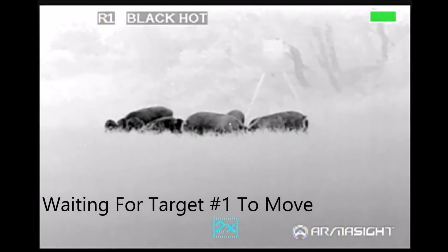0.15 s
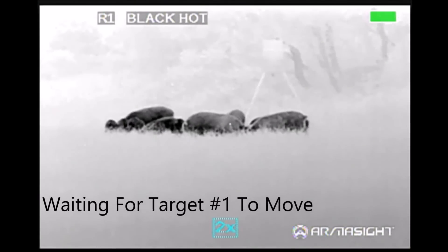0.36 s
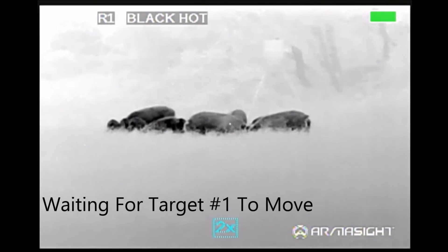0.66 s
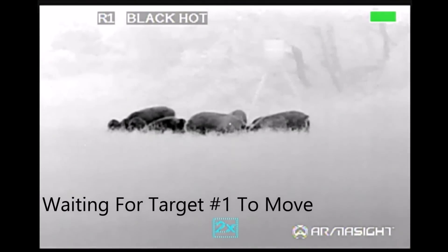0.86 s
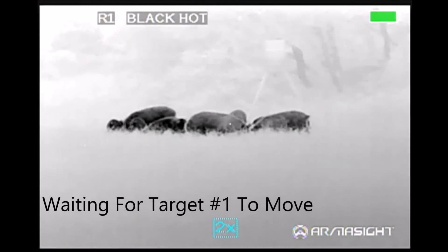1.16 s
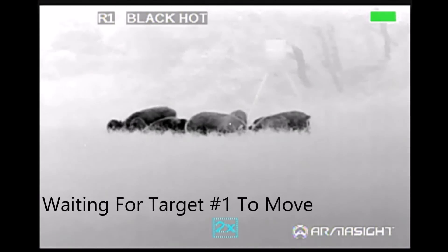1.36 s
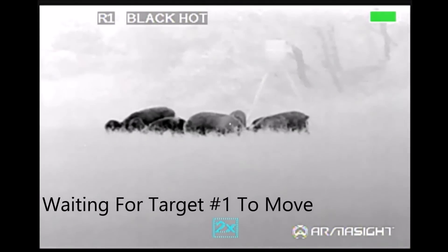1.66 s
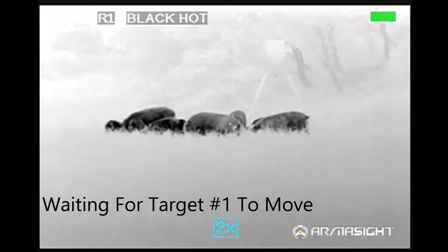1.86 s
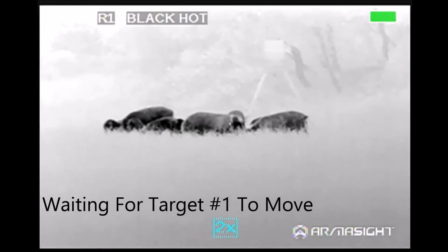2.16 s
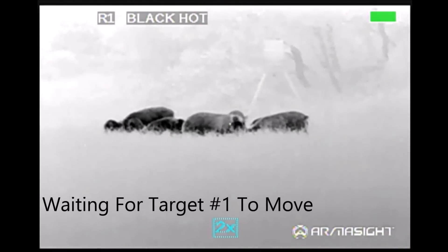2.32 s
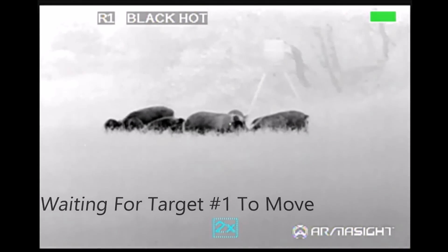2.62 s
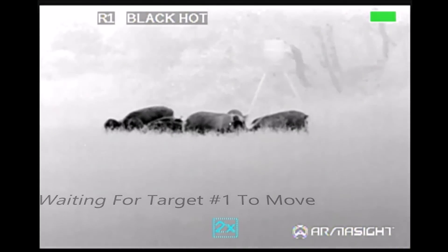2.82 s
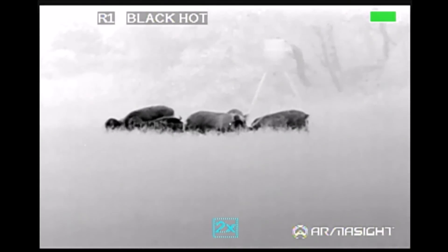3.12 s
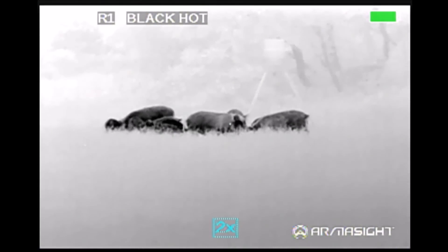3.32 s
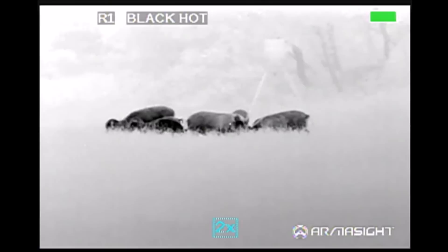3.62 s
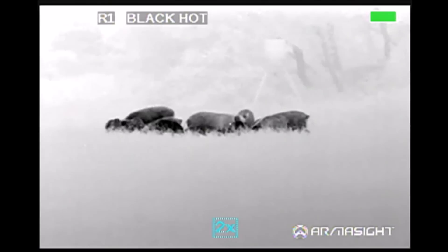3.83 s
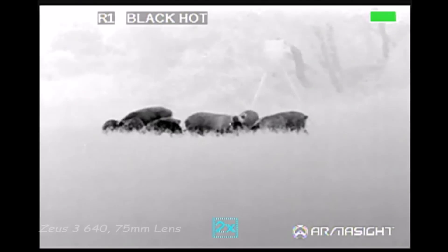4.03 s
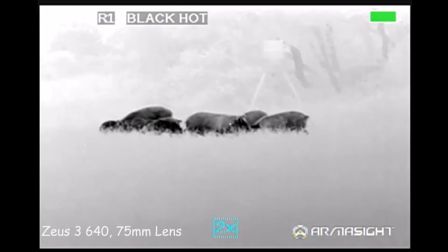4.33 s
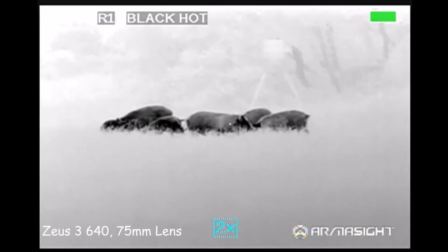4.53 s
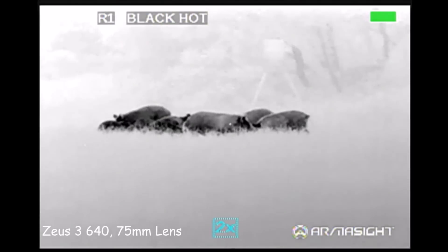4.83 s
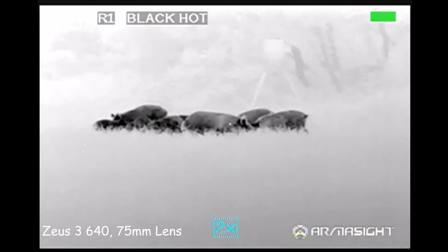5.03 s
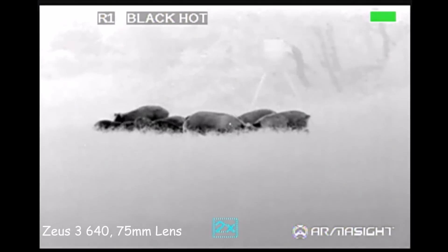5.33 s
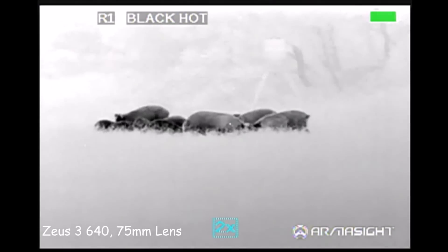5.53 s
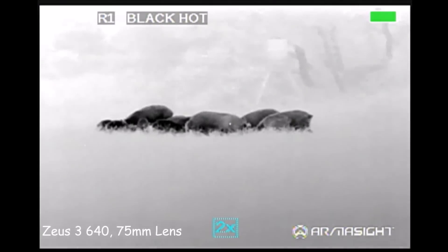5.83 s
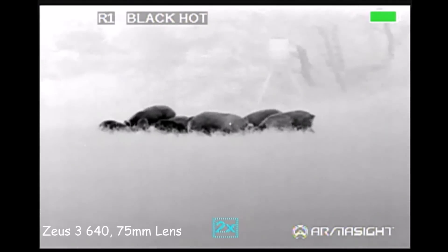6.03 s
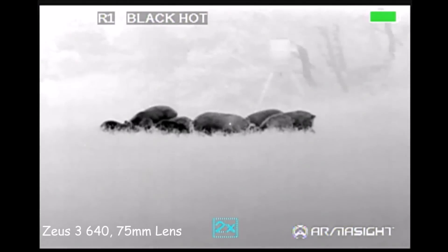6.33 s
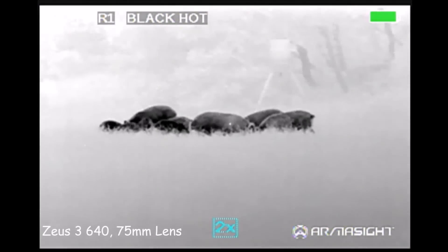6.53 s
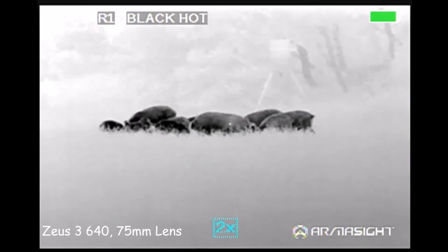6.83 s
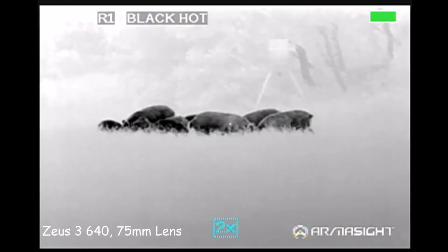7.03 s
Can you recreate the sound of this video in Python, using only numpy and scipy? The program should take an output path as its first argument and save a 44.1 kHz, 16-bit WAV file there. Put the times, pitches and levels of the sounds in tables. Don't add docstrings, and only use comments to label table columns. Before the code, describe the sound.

Night in an open field. A low cricket trills evenly without pause while two higher crickets, one nearer and louder, trill in separate overlapping bursts with small stumbles. Wind rumbles in gusts on the microphone above a wavering far engine drone and constant hiss. Faint knocks on the gear and tiny digital ticks come and go.

```python
import sys
import numpy as np
from scipy import signal
from scipy.fft import rfft, irfft
from scipy.io import wavfile
from scipy.ndimage import uniform_filter1d

SR = 44100
rng = np.random.default_rng(int(sys.argv[2]) if len(sys.argv) > 2 else 0)


def how_loud(loudness_db):
    steps = np.asarray(loudness_db, float) / 20
    return 10 ** steps


def pcm_store(signal):
    levels = np.round(np.clip(np.atleast_2d(signal), -1, 1) * 32767)
    wavfile.write(sys.argv[1], SR, levels.astype(np.int16).T)


N = 316197


def evened(x):
    return x / np.sqrt(np.mean(x ** 2) + 1e-20)


def levelled(x, size):
    return evened(x / np.sqrt(uniform_filter1d(x ** 2, size) + .15))


def curve(rows):
    time_s, level_db = np.transpose(rows)
    return np.interp(np.arange(N) / SR, time_s, level_db)


def add(mix, start_s, sound):
    part = mix[max(round(start_s * SR), 0):][:len(sound)]
    part += sound[:len(part)]


def coloured(db_at):
    hz = np.fft.rfftfreq(N, 1 / SR)
    spectrum = rfft(rng.standard_normal(N))
    return evened(irfft(spectrum * how_loud(db_at(hz)), N))


def read(points):
    freq_hz, level_db = np.transpose(points)
    return lambda hz: np.interp(np.log(hz + 1), np.log(freq_hz + 1), level_db)


def fuzzy_lines(lines):
    def db_at(hz):
        power = 0
        for freq_hz, width_hz, level_db in lines:
            detuning = 2 * (hz - freq_hz) / width_hz
            power = power + how_loud(2 * level_db) / (1 + detuning ** 2) ** 2 / width_hz
        return 10 * np.log10(power)
    return coloured(db_at)


def hiss():
    # freq_hz, level_db
    hiss_spectrum = [(30, -14), (60, -5), (100, -2), (200, -5.5), (400, -8.3), (1000, -15), (2000, -18.5),
                     (4100, -20.6), (5300, -20.6), (7000, -23), (10000, -24.3), (10500, -30), (11000, -46),
                     (11300, -90)]
    return how_loud(-43.3) * coloured(read(hiss_spectrum))


def drone():
    # freq_hz, width_hz, level_db
    low_lines = [
        (73, 4.5, -.5),
        (83, 5, .3),
    ]
    # freq_hz, width_hz, level_db
    high_lines = [(106, 14, .5), (124, 10, -2), (140, 5, -2), (166, 7, -8)]
    # time_s, level_db
    carrying = [(0.0, -57), (0.12, -41), (1.08, -46), (1.2, -32), (1.26, -52), (1.36, -37), (1.65, -43),
                (1.96, -35), (1.98, -41), (5.59, -38), (5.79, -46), (5.91, -33), (6.13, -49), (6.15, -40),
                (6.77, -45), (6.79, -38), (7.15, -47), (7.17, -54)]
    hum = how_loud(curve(carrying)) * levelled(fuzzy_lines(low_lines), size=8000)
    return hum + how_loud(-49) * levelled(fuzzy_lines(high_lines), size=16000)


def wind():
    # time_s, level_db
    gusts = [(0.0, -36), (0.3, -38), (0.5, -30), (1.72, -36), (1.8, -27), (2.23, -33), (2.37, -27),
             (2.89, -38), (3.24, -31), (3.3, -40), (4.19, -31), (4.21, -38), (4.87, -37), (5.45, -28),
             (5.47, -37), (6.15, -33), (6.23, -39), (7.17, -34)]
    # freq_hz, level_db
    buffet = [(2, -25), (5, -1), (12, 1.5), (21, -1.5), (38, -4.5), (50, -9), (65, -16), (90, -40),
              (150, -100)]
    steady_db = -42
    strength = np.hypot(how_loud(curve(gusts)), how_loud(steady_db))
    return strength * levelled(coloured(read(buffet)), size=10000)


def knocks():
    # start_s, peak_db, pitch_hz, length_s
    knock_events = [(.329, -40, 550, .007), (.338, -41, 700, .007), (.343, -46, 3250, .014),
                    (.36, -47, 3200, .012), (.9945, -32, 420, .005), (3.2785, -32.5, 1220, .004),
                    (3.4575, -35, 1290, .0045), (3.704, -35, 760, .015), (3.706, -41, 450, .01),
                    (3.78, -38.5, 560, .013), (3.784, -43, 1150, .008), (6.222, -47, 5750, .008),
                    (6.675, -44, 630, .025)]
    out = np.zeros(N)
    for start_s, peak_db, pitch_hz, length_s in knock_events:
        t = np.arange(0, length_s, 1 / SR)
        swell = signal.windows.tukey(len(t), .6)
        add(out, start_s, how_loud(peak_db) * swell * np.sin(2 * np.pi * pitch_hz * t))
    return out


def cricket(trills, efforts, swell, wing, skips):
    start_hz, end_hz, late_fall, rise, fall, lead, delay, echo_db, spread_db, loose, gain_db = wing
    opening_db, growth_db, tired_db, tire_s, lateness = swell
    t = np.arange(-rise, fall, 1 / SR)
    shape = np.cos(np.pi / 2 * np.where(t < 0, t / rise, t / fall))
    pitch_hz = start_hz + (end_hz - start_hz) * np.linspace(0, 1, len(t)) ** late_fall
    turns = np.cumsum(pitch_hz) / SR
    out = np.zeros(N)
    for (first, last, strokes, slowing_us), (full_db, cold_db, warm_s) in zip(trills, efforts):
        k = np.arange(strokes + 1)
        ahead = slowing_us / 1e6 * k * (strokes - k) / 2
        ahead = ahead * (1 + lateness * (2 * k / strokes - 1))
        times = first + (last - first) * k / strokes - ahead
        period = np.diff(times).mean()
        scale = np.sqrt(period * SR / np.sum(shape ** 2) * 2)
        chance = rng.standard_normal((len(times), 4))
        for at, (size, tune, late, phase) in zip(times, chance):
            if np.min(abs(np.array(skips) - at)) < period / 2:
                continue
            db = full_db + spread_db * size + gain_db
            db += cold_db * np.exp((first - at) / warm_s) + tired_db * np.exp((at - last) / tire_s)
            db += growth_db * (at - last) + opening_db * (at == first)
            mistuning = .003 * tune * start_hz * t
            tone = np.sin(2 * np.pi * (turns + mistuning) + loose * phase)
            jitter_s = .00005 * (loose - .9) * late
            add(out, at + lead - rise + jitter_s, how_loud(db) * scale * shape * tone)
    lag = round(delay * SR)
    return out + how_loud(echo_db) * np.r_[np.zeros(lag), out[:-lag]]




def far_cricket():
    far_trills, far_efforts = [(.0052, .9123, 62, 27), (1.0512, 1.7666, 49, 28), (1.8791, 2.1334, 18, 40),
                               (3.6274, 4.0997, 32, 70), (4.2727, 4.7345, 32, -15), (4.8313, 5.494, 46, 40),
                               (5.651, 6.2258, 40, 27), (6.3418, 7.154, 56, 17)], [(-53.2, -1, .12), (-53.5, -6, .12), (-55.5, -3, .08),
                                                   (-53.5, -2, .15), (-52.7, -5, .1), (-53.2, -3, .2),
                                                   (-52.5, -3, .06), (-52.3, -4, .1)]
    far_swell, far_wing = (0, .8, -3.5, .025, .45), (5275, 4990, 1.9, .0064, .0046, .0003, .0037, -18, 1.4, 6, 1.1)
    far_skips = [0.019, 0.089, 0.46, 0.518, 0.878, 1.279, 1.349, 1.449, 3.67, 3.684, 3.727, 3.783, 4.019,
                 4.302, 4.416, 4.612, 4.626, 4.886, 4.982, 5.024, 5.051, 5.122, 5.451, 5.878, 5.959, 6.119,
                 6.496]
    return cricket(far_trills, far_efforts, far_swell, far_wing, far_skips)


def near_cricket():
    near_trills, near_efforts = [(.1918, .4077, 16, 0), (.74, 1.2786, 39, 27), (1.5236, 2.3393, 58, 22),
                                 (2.5613, 3.24, 49, 20), (3.6886, 3.9662, 20, 50), (4.3772, 4.955, 41, 26),
                                 (5.1531, 6.0333, 62, 28), (6.2641, 7.0163, 54, 21)], [(-48, -11, .075), (-44, -9, .25), (-45.5, -13, .075),
                                                      (-46.8, -3, .075), (-46.5, -7, .12), (-46, -12, .075),
                                                      (-45, -13, .065), (-45.5, -11, .055)]
    near_swell, near_wing = (6, 2.5, -4, .012, .1), (4992, 4590, 2.7, .0075, .0023, .0011, .00403, -7.5, 1.3, 6,
                                                 .2)
    near_skips = [0.233, 0.385, 0.778, 0.956, 1.265, 1.619, 2.277, 2.292, 2.574, 2.586, 2.654, 3.114, 3.215,
                  3.715, 3.728, 3.784, 4.418, 5.194, 5.207, 5.622, 5.972, 6.277]
    return cricket(near_trills, near_efforts, near_swell, near_wing, near_skips)


def low_cricket():
    low_trills = [
        (.0048, 5.1321, 213, .3),
        (5.157, 6.0147, 35, -30),
        (6.0388, 7.1459, 46, 0),
    ]
    low_efforts = [(-54.8, 0, .1), (-54.8, 0, .1), (-54.3, 0, .1)]
    low_swell, low_wing = (0, 0, 0, .1, 0), (3575, 3268, .96, .0067, .0077, -.0008, .00303, -13.5, .8,
                                              1.05, 1.5)
    return cricket(low_trills, low_efforts, low_swell, low_wing, [-1])


def scene():
    background = hiss() + drone() + wind() + knocks()
    insects = far_cricket() + near_cricket() + low_cricket()
    return (background + insects)[None]


def starve(x):
    # middle_s, length_s, cut_db (over the top hiss), lost (share of weak lines, 0-1)
    starved = [(.829, .015, 5.5, .88), (1.38, .016, 4.5, .78), (1.577, .015, 6, .93),
               (1.799, .027, 5.5, .999), (2.366, .014, 4.5, .82), (3.372, .017, 4, .72),
               (4.943, .015, 7, .999), (5.695, .017, 5, .78), (6.017, .015, 5.5, .83),
               (6.179, .016, 6, .96), (6.788, .015, 6.5, .95), (6.872, .012, 5.5, .84),
               (6.992, .016, 5, .78)]
    hz, t, z = signal.stft(x, SR, nperseg=512, noverlap=448)
    tilt = np.clip(hz / 8000, .05, 1)[:, None] ** .55
    power = abs(z) ** 2 * tilt
    power = power / np.median(power[(hz > 7000) & (hz < 9000)])
    for middle_s, length_s, cut_db, lost in starved:
        inside = np.clip(2.5 - 4 * abs(t - middle_s) / length_s, 0, 1)
        near = inside > 0
        held_db = 10 * np.log10(power @ inside / inside.sum() + 1e-9)
        held_db += 2.2 * np.repeat(rng.standard_normal(len(hz)), 3)[:len(hz)]
        kept = 1 / (1 + np.exp(np.clip((cut_db - held_db) / .5, -30, 30)))
        spared = kept * np.where(held_db < cut_db + 6, 1.4, lost)
        z[:, near] *= 1 - inside[near] * (lost - spared[:, None])
    return signal.istft(z, SR, nperseg=512, noverlap=448)[1][:N]


def splices():
    # time_s, level_db
    loud_ticks = [(.4537, -39), (.5873, -43), (.8876, -41), (.9544, -47), (1.3882, -47), (1.5217, -45),
                  (1.9556, -39), (2.0891, -43), (2.2894, -39), (2.5229, -38), (3.3573, -46), (3.7912, -43),
                  (3.858, -41), (4.1583, -38), (4.2251, -46), (4.3586, -41), (5.4266, -46), (5.4933, -44),
                  (6.0607, -41), (6.1275, -43), (6.4946, -41), (6.5613, -43), (1.1546, -48), (2.7232, -48),
                  (5.0595, -50), (5.5601, -48), (6.6281, -48), (6.7616, -49), (7.062, -49), (7.1287, -50)]
    first_frame_s, frame_s = .0199, .033375
    first_burst, burst_frames, round_frames = -93, 17, 100
    burst, tick = np.mgrid[:19, :6]
    frame = first_burst + round_frames * (burst // 6) + burst_frames * (burst % 6) + 2 * tick
    s = first_frame_s + frame_s * frame.ravel()
    faint_db = -54 - 2.2 * tick.ravel() + 5 * rng.standard_normal(len(s))
    db = np.minimum(faint_db, -50)
    for loud_s, loud_db in loud_ticks:
        db[np.argmin(abs(s - loud_s))] = loud_db
    inside = (s > 0) & (s < N / SR)
    return s[inside], db[inside]


def top_cut(x):
    return signal.sosfilt(signal.butter(12, 17070, fs=SR, output="sos"), x)


def record(dry):
    x = starve(dry[0])
    s, db = splices()
    at = np.round(s * SR).astype(int)
    x[at] -= np.sign(x[at]) * how_loud(db + 14.8)
    lowpass = signal.firwin(511, 15900, window=("kaiser", 9), fs=SR)
    x = signal.oaconvolve(x, lowpass, "same")
    return top_cut(x[None])


dry = scene()
out = record(dry)
pcm_store(out)
```